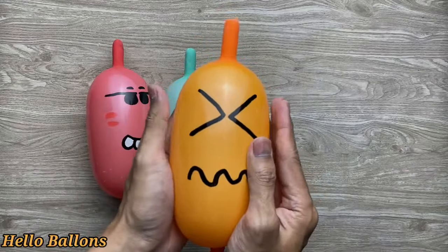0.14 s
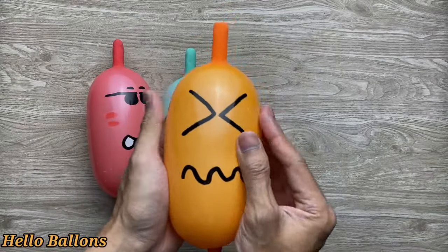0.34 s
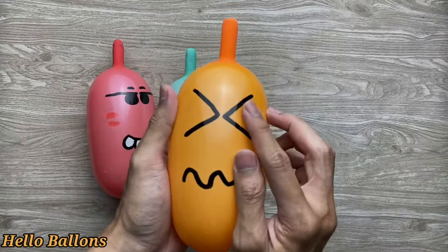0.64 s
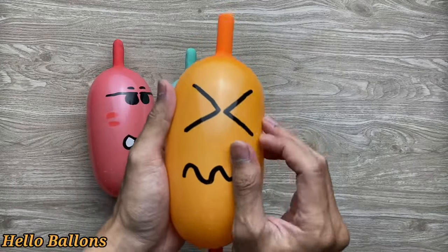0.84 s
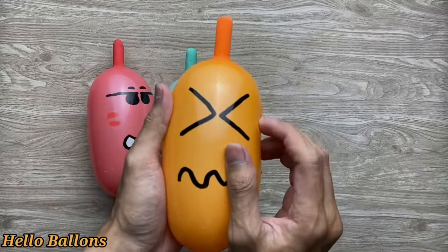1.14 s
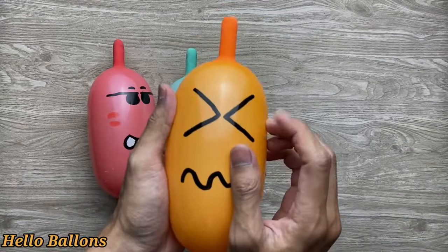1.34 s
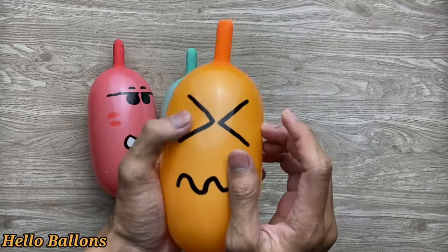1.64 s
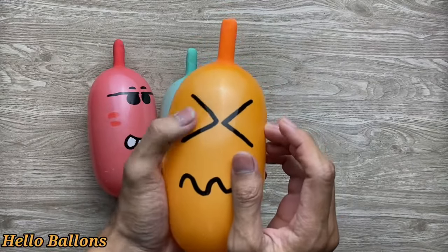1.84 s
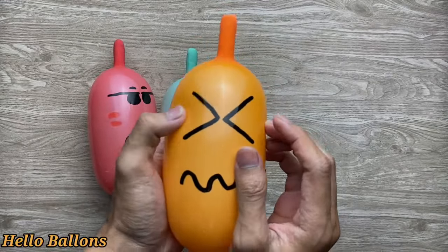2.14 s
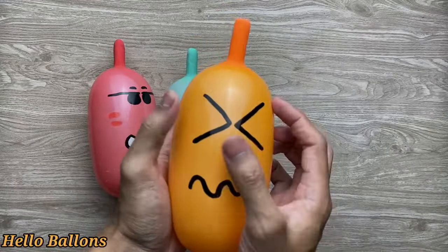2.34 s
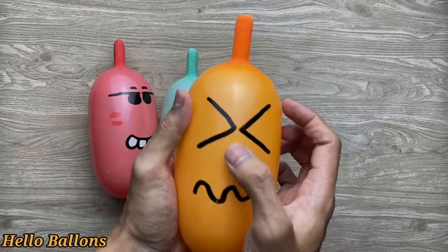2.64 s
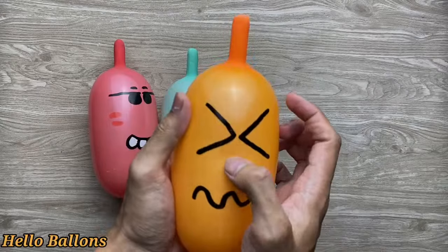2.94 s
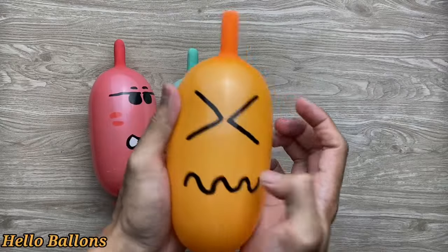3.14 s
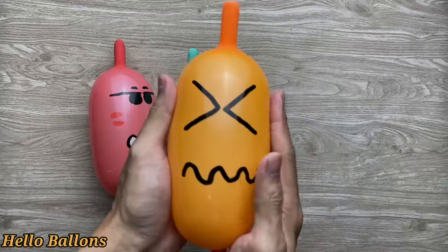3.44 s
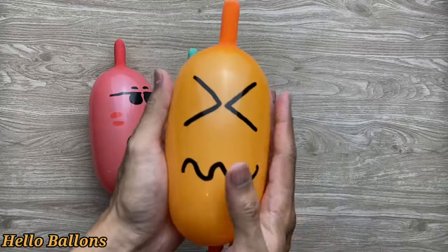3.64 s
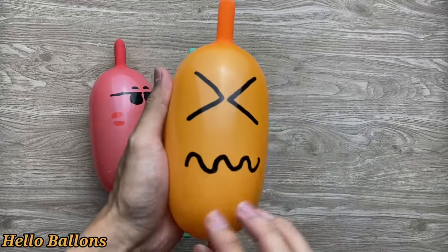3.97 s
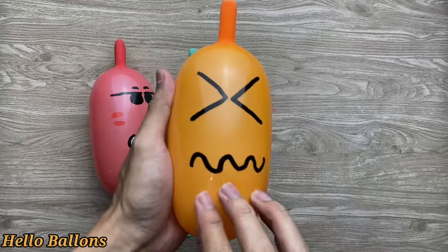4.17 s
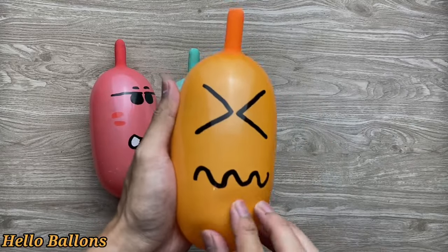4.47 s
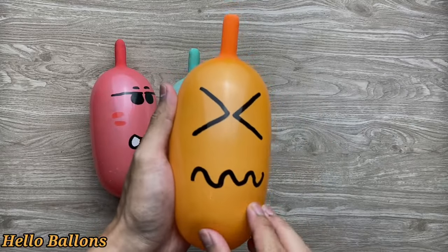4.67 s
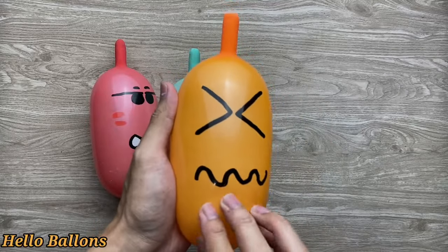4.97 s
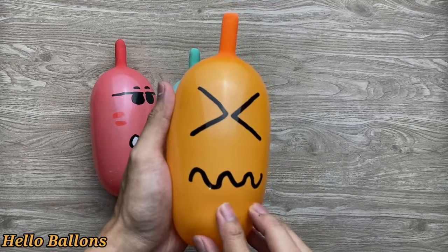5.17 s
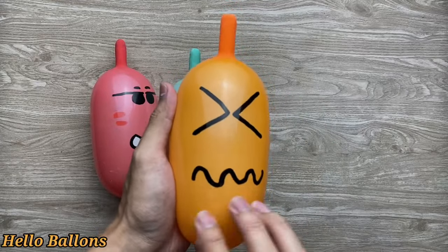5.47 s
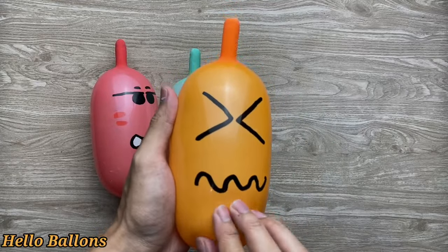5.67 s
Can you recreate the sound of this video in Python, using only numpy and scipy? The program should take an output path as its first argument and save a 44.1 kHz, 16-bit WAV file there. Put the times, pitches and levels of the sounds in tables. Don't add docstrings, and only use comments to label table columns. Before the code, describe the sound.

Close stereo microphone in a small quiet room: fingertips stick and slip on a filled latex balloon. Short hollow mid-pitched grunts and scrapes come in separate bursts, with small ticks and bright release pops. Around the middle it is sparser, then sharp pops cluster, one very brief squeak sounds, and several fingers scrape in dense fluttering bursts to the end. Low room rumble lies beneath.

```python
import sys
import numpy as np
from scipy import signal
from scipy.fft import rfft, irfft, next_fast_len
from scipy.io import wavfile
from scipy.ndimage import uniform_filter1d, map_coordinates

SR = 44100
rng = np.random.default_rng(int(sys.argv[2]) if len(sys.argv) > 2 else 0)


def boost_factor(decibels):
    exponent = np.asarray(decibels, float) / 20
    return 10 ** exponent


def pcm_store(signal):
    levels = np.round(np.clip(np.atleast_2d(signal), -1, 1) * 32767)
    wavfile.write(sys.argv[1], SR, levels.astype(np.int16).T)


N = 256220

# start t/s, rise t/s, fall t/s, ring level/dB, rasp level/dB re ring
DRAGS = [(1.016, 0.0662, 0.02, -19, -32), (1.258, 0.012, 0.085, -27.5, -26.5),
         (1.44, 0.03, 0.042, -23.5, -23.5), (1.6, 0.0734, 0.0166, -24, -10.5),
         (2.145, 0.073, 0.0025, -37, -18), (2.705, 0.053, 0.005, -30, -13.5),
         (2.772, 0.0014, 0.026, -18.5, -23.5), (2.912, 0.06, 0.022, -30, -15),
         (3.083, 0.038, 0.0035, -30, -10.5), (3.485, 0.0013, 0.033, -15.5, -26),
         (3.578, 0.0024, 0.022, -35.5, -8.5), (3.74, 0.021, 0.027, -21, -30.5),
         (4.877, 0.046, 0.02, -35, -13)]
SCRAPES = [(0.0, 0.037, 0.0014, -30, -20), (.24, 0.033, 0.036, -23.5, -29),
           (3.765, 0.042, 0.02, -29, -26.5), (.733, 0.045, 0.04, -27.5, -21),
           (4.174, 0.0091, 0.016, -26, -18.5), (1.033, 0.011, 0.017, -33.5, -23),
           (4.275, 0.016, 0.047, -25.5, -16.5), (4.376, 0.047, 0.042, -23.5, -16.5),
           (4.523, 0.025, 0.032, -20, -22), (4.6, 0.0031, 0.0061, -27, -40),
           (4.93, 0.022, 0.016, -32.5, -11), (4.985, 0.0083, 0.1, -25.5, -24.5),
           (5.162, 0.01, 0.034, -26, -25), (5.19, 0.037, 0.0054, -32, -15.5),
           (5.255, 0.035, 0.044, -24.5, -22.5), (5.605, 0.034, 0.03, -27, -23.5),
           (5.68, 0.05, 0.049, -24, -21.5)]
BRUSHES = [(.36, 0.062, 0.021, -45.5, -11.5), (.49, 0.018, 0.045, -46, -22.5),
           (1.84, 0.013, 0.11, -35.5, -18.5), (2.45, 0.02, 0.13, -37, -16),
           (3.41, 0.0061, 0.39, -45, -28.5), (3.598, 0.011, 0.16, -59.5, -4.5),
           (4.12, 0.052, 0.0094, -43, -14), (4.8, 0.047, 0.022, -58, -15.5),
           (.195, 0.013, 0.15, -42.5, -20), (3.14, 0.02, 0.033, -35.5, -25),
           (3.86, 0.0091, 0.037, -37.5, -24.5), (4.63, 0.011, 0.032, -35.5, -21),
           (4.69, 0.018, 0.079, -49.5, -7), (5.39, 0.017, 0.034, -64, 9)]
# landing level/dB, end of fall level/dB, wall push level/dB re ring
DRAG_SHAPE = (-19, -58.5, -20)
SCRAPE_SHAPE = (-7, -2.5, -26)
BRUSH_SHAPE = (-19, -20.5, -33)
# start t/s, end t/s
DRY_SKIN = [
    (1.84, 1.93),
    (2.45, 2.6),
    (2.7, 2.77),
    (3.08, 3.12),
    (1.4, 1.46),
    (1.59, 1.65),
    (2.92, 2.97),
    (4.27, 4.35),
]
# t/s, level/dB
SQUEEZE = [(0.0, 6), (.5, 4.5), (1.5, 5.5), (2.1, -10), (2.6, -18), (3.5, 1), (3.8, -9), (4.2, -25),
           (4.32, -30), (4.5, -17), (4.95, -26), (5.05, -10), (5.2, 11), (5.35, 4.5), (5.62, -22),
           (5.72, 3)]
# t/s, ring peak level/dB, f/Hz, wall boom level/dB re ring
JERKS = [(0.003, -20, 604, -17), (0.014, -18.5, 703, -14), (0.026, -23, 550, 3), (0.039, -17, 616, -7),
         (0.046, -23, 610, 4.5), (0.25, -22.5, 710, 2.5), (0.255, -44, 680, -25),
         (0.261, -16.5, 670, -18.5), (0.27, -17, 620, -32.5), (0.276, -25.5, 620, -19),
         (0.282, -15.5, 624, -14.5), (0.288, -25, 630, 6), (0.295, -18, 630, -18), (0.305, -30, 715, -21),
         (0.31, -25, 747, -18.5), (0.736, -20, 680, -10.5), (0.742, -20, 653, -31), (0.752, -18.5, 667, 1),
         (0.757, -18.5, 825, 4), (0.768, -18, 695, -12), (0.779, -15.5, 618, -7.5), (0.784, -23, 640, 6),
         (0.795, -11.5, 758, -15), (0.805, -17.5, 846, -28.5), (3.512, -12.5, 830, -4.5),
         (1.039, -19, 614, -5.5), (1.054, -24, 570, -4), (1.068, -14, 650, -26), (1.077, -21, 697, -18),
         (1.46, -18.5, 633, -39), (1.474, -17.5, 725, -10), (1.489, -39, 795, -22), (1.625, -22, 623, -16),
         (1.639, -23.5, 743, 0.5), (1.652, -15, 765, -18), (1.66, -19, 788, -4), (1.67, -31, 474, -27),
         (2.766, -18.5, 699, -15), (2.774, -17, 686, -24.5), (2.783, -21.5, 707, -28),
         (2.971, -18, 707, -12.5), (3.124, -16, 625, -4), (2.984, -24, 670, -13), (3.579, -15, 632, -20),
         (3.808, -11, 702, -21), (3.819, -22.5, 640, -18), (3.825, -22.5, 560, -11), (3.83, -29, 480, -11),
         (4.992, -23.5, 783, -20), (5.045, -16, 705, -26), (5.771, -16.5, 750, -11)]
# t/s, ring peak level/dB, f/Hz, swell t/s
CATCHES = [(4.176, -21, 724, 0.0046), (4.199, -34, 654.7, 0.0051), (4.2, -21, 701.3, 0.004),
           (4.279, -24.5, 620.2, 0.0051), (4.296, -18, 785.2, 0.0044), (4.304, -33.5, 765.3, 0.0035),
           (4.323, -22.5, 730, 0.0038), (4.348, -28, 713.4, 0.0042), (4.381, -19, 726.6, 0.0032),
           (4.398, -15.5, 672.6, 0.0051), (4.412, -11, 684, 0.0045), (4.428, -11.5, 705.8, 0.0036),
           (4.435, -27, 729.5, 0.0037), (4.453, -23, 679, 0.0075), (4.53, -20.5, 862.5, 0.0032),
           (4.541, -18.5, 600.5, 0.0083), (4.561, -18, 788.3, 0.0049), (4.567, -18, 685, 0.0059),
           (4.607, -25.5, 692.5, 0.0035), (4.906, -22.5, 663.8, 0.0044), (4.941, -30.5, 763.4, 0.0052),
           (4.983, -18, 756, 0.0054), (5.001, -18.5, 835.3, 0.0014), (5.008, -22, 722.7, 0.0034),
           (5.021, -18, 713.4, 0.0026), (5.026, -26, 633, 0.0018), (5.035, -16.5, 701.7, 0.003),
           (5.063, -22.5, 630.1, 0.0058), (5.095, -23.5, 728.6, 0.0026), (5.165, -23.5, 671.5, 0.0039),
           (5.198, -20, 699, 0.0035), (5.221, -17.5, 629, 0.0035), (5.231, -20.5, 763.7, 0.0035),
           (5.259, -23, 812.6, 0.0056), (5.268, -23.5, 751.7, 0.0062), (5.288, -19.5, 882, 0.0071),
           (5.317, -20.5, 754, 0.0045), (5.61, -23, 777, 0.0087), (5.621, -26, 711, 0.0064),
           (5.652, -18, 694.6, 0.0066), (5.669, -21, 690, 0.0047), (5.685, -22, 628, 0.0063),
           (5.694, -18, 725, 0.0044), (5.711, -16, 598, 0.0038), (5.722, -18, 648, 0.0053),
           (5.74, -15.5, 758, 0.0049), (5.757, -17, 741, 0.0056), (5.766, -19, 726, 0.0043),
           (5.79, -20, 695, 0.0063)]
# t/s, ring peak level/dB, thud level/dB re ring, peel hiss level/dB re ring
POPS = [(0.069, -20.5, 5, -11), (0.078, -19.5, -29.5, 2.5), (0.25, -41.5, 8, -14.5), (0.32, -14, -3, -5),
        (1.268, -25.5, -7, -36), (1.421, -41, 14, -7.5), (1.942, -29, 13, -3.5), (2.016, -32, -18.5, -15),
        (2.043, -30, 23, -14), (2.048, -19, -17.5, -8.5), (2.214, -13.5, 5.5, -13.5),
        (2.765, -21, -10, -21), (2.971, -28.5, -15.5, -9), (3.122, -10, -1, -24.5), (3.216, -14, -8, -27),
        (3.235, -15, -2.5, -4.5), (3.319, -21.5, -0.5, -23), (3.445, -35.5, 2, -10), (3.483, -25.5, -9, -6),
        (3.512, -13.5, 5, -4), (3.579, -29, -9, -9.5), (4.296, -14.5, -30, -22.5),
        (4.992, -32.5, -18, -0.5)]
# t/s, ring peak level/dB, peel hiss level/dB re ring
TICKS = [(0.198, -35, -22), (.44, -38, -13.5), (2.528, -32, -16), (4.725, -48, -4), (4.838, -40, -30),
         (0.209, -31, -43), (0.713, -31.5, -32), (0.723, -27, -29), (4.881, -33, -18), (3.241, -32.5, 6),
         (0.963, -41, -20.5), (1.209, -31.5, -24.5), (1.406, -34.5, -18), (1.451, -39, -24),
         (1.853, -37, -34), (1.886, -33, -15), (2.391, -43, -25), (2.507, -33.5, -7.5), (2.585, -32.5, -20),
         (2.871, -47, -18.5), (3.197, -30.5, -15), (3.333, -25, -41), (3.667, -39, -19), (3.697, -46, -8.5),
         (4.904, -52, -34)]
# t/s, level/dB, f/Hz
SQUEAK = [
    (3.757, -34, 640),
    (3.766, -19, 680),
    (3.771, -24, 630),
    (3.775, -11.5, 600),
    (3.788, -9.6, 598),
    (3.797, -9.8, 596),
    (3.803, -17, 590),
    (3.808, -34, 585),
]
# start t/s, length t/s, peak level/dB, first f/Hz, last
# f/Hz
CHIRPS = [(.402, .016, -48, 3050, 3200), (3.234, 0.013, -18.5, 1050, 996), (3.234, 0.013, -29, 1350, 1160),
          (4.9, .07, -38, 1000, 1340), (4.988, .06, -31, 960, 800), (4.95, .085, -42, 1610, 1580),
          (5.68, .125, -27, 370, 450), (1.07, .014, -30, 1280, 1270), (4.195, .02, -36, 1560, 1620),
          (5.318, 0.04, -30.5, 410, 430), (3.806, 0.035, -27, 680, 530), (3.748, .022, -33, 230, 420),
          (3.802, .055, -28, 400, 160), (3.818, .024, -29, 450, 370), (5.52, .035, -50, 725, 680),
          (5.2, 0.049, -30, 450, 190), (4.39, 0.06, -27, 430, 340), (5.715, .07, -27, 800, 950),
          (5.04, .07, -32, 430, 330), (4.535, .05, -28, 420, 380)]
# t/s, level/dB
CREAK = [(0.0, -53), (0.14, -70.5), (0.47, -74), (3.68, -66), (3.91, -76), (4.2, -65), (4.55, -41),
         (4.68, -64.5), (4.95, -77), (5.3, -51), (5.6, -81)]
# f/Hz, width f/Hz, level/dB
AIR_MODES = [(411, 24, 8), (606.4, 15, 8), (686.6, 78, 15.5), (814, 38, -3), (899, 80, 7.5), (1065, 200, 1),
             (1255, 29, -7), (1694, 130, -15), (1576, 26, -4), (2853, 24, -11.5), (3150, 43, -20)]
# t/s, f/Hz
AIR_PITCH = [(0.0, 667), (0.44, 709), (0.53, 670), (0.89, 780), (0.97, 602), (1.73, 793), (2.02, 682),
             (2.56, 724), (3.12, 693), (3.23, 775), (3.37, 588), (3.5, 800), (3.67, 658), (4.0, 636),
             (4.2, 803), (4.98, 766), (5.18, 662), (5.34, 834)]
# f/Hz, width f/Hz, level/dB
WALL_MODES = [(128, 25, 7.5), (191, 11, -8.5), (270, 48, -5.5), (354, 78, 18.5)]
# f/Hz, width f/Hz, level/dB
SKIN_MODES = [(1020, 200, 17), (1266, 29, 6), (1611, 45, 12), (2021, 32, 9.5), (2194, 50, -4),
              (2810, 38, 10.5), (3150, 34, 10.5), (3380, 990, 16), (3643, 19, 1), (4430, 40, 0.5),
              (4940, 24, -13), (5320, 22, -6), (5670, 22, -9), (6140, 980, 2)]
# f/Hz, level/dB
RASP = [(700, -68), (1300, 5.5), (2500, 3.5), (4500, -4.5), (7000, -8), (10000, -13), (15000, -20)]
# f/Hz, level/dB per Hz
RUMBLE = [(15, -41), (25, -3), (74, 7.5), (96, -15), (124, -1.5), (145, -24.5), (161, -11.5), (183, -8.5),
          (291, -13), (500, -33.5), (665, -52), (1200, -41), (12000, -62), (15600, -106), (22000, -120)]
# t/s, level/dB
RUMBLE_SWELL = [
    (0.0, -53),
    (0.69, -55),
    (1.07, -53.5),
    (1.25, -58),
    (1.67, -50.5),
    (2.72, -55.5),
    (3.749, -50.5),
    (5.149, -50.5),
    (5.52, -52),
    (5.81, -62),
]
# start t/s, end t/s, f/Hz, width f/Hz, level/dB
HUMS = [
    (1.45, 2.145, 65.2, 5.8, -46),
    (4.498, 5.753, 181.6, 11.6, -55),
]
# f/Hz, t60 t/s
ROOM = [(150, 0.12), (700, 0.18), (3000, 0.12), (10000, 0.18)]
# f/Hz, level/dB re direct
ROOM_COLOUR = [(100, -10), (700, -12), (2500, -4.5), (8000, -6.5), (15000, -10.5)]
# f/Hz, phase/rad
PORT_LEAD = [(0, 0), (1380, 1.1), (1640, -0.5), (1890, 1.5), (2500, 1.4), (5000, 5.9), (7580, 4.6),
             (10500, -0.6), (11300, -3.0), (12700, -3.2), (13300, -6.3), (14500, -6.4), (15500, -9.9),
             (16000, -7.7)]
# f/Hz, left minus right level/dB
PORT_BALANCE = [(60, -4), (150, 2), (380, 1), (650, 0), (1100, 5), (2380, 5.5), (4200, 8), (7000, -3.5),
                (15000, 1.5)]
# t/s, extra path to the right port/samples
HAND_SIDE = [(0, 2.0), (.5, 1.5), (.7, -1.8), (1.3, -1.0), (1.6, 1.0), (2.3, 2.0), (2.7, .2), (3.1, 2.0),
             (3.9, 2.0), (4.1, -1.0), (5.81, -1.0)]
# f/Hz, level/dB
MICROPHONE = [(6500, -2), (7800, 0), (8600, -1.5), (9300, 4), (10500, -2), (11500, 0.5), (12200, -9),
              (13000, 1), (14500, 2.5), (15400, -6.5), (15900, -20.5), (17000, -46.5)]

PATCH_DB = 2.5
AIR_WIDTH_HZ = 75.0
LEAD_S = 0.001


def strokes():
    t = np.arange(N) / SR
    ring_gain, wall_gain, rasp_gain = pressure()
    several = t > 4.1
    dry = sum((t > start) & (t < end) for start, end in DRY_SKIN) > 0
    slips_per_s = np.where(several, 215., np.where(dry, 155., 130.))
    knocks = slips(slips_per_s, uneven=np.where(dry, .1, .3), spread_db=2.5)

    flare = through(knocks, np.exp(-np.arange(600) / SR / 0.0017))
    hiss = rng.standard_normal(N) * (1.38 + flare / flare.mean())
    ticks = np.where(dry, .5, .08) * knocks
    rasp = rasp_gain * (ticks + np.where(dry, .3, .55) * hiss)

    rub = 0.22 * soften(knocks, .0009) + np.where(several, .22, .2) * hiss
    drag = soften(ring_gain * rub, 0.00046)
    air = 0.69 * wandering(drag, AIR_MODES, wander_db=PATCH_DB)
    air += 10.2 * resonate(drag, curve(AIR_PITCH), AIR_WIDTH_HZ)
    skin = patchy(through(rasp, tick(RASP)), patch_db=PATCH_DB)
    skin += 0.12 * wandering(rasp, SKIN_MODES, wander_db=PATCH_DB)
    wall = wandering(soften(wall_gain * knocks, 0.0018), WALL_MODES, wander_db=-1.5)
    return air + skin + wall


def pressure():
    touch_s, touch_db = 0.0064, -24.5
    lift_s, lift_db = 0.024, -19
    rise_bend = 0.93
    push_grows = 0.61
    follows = [1, 1, 1]
    gains = np.zeros((3, N))
    kinds = ((DRAGS, DRAG_SHAPE), (SCRAPES, SCRAPE_SHAPE), (BRUSHES, BRUSH_SHAPE))
    for rows, (land_db, end_db, push_db) in kinds:
        for start, rise, fall, db, rasp_db in rows:
            t = np.arange(-min(start, touch_s), rise + fall + lift_s, 1 / SR)
            swing_db = land_db * np.clip(1 - t / rise, 0, 1) ** rise_bend
            swing_db += end_db * np.clip((t - rise) / fall, 0, 1)
            edge_db = lift_db * np.clip((t - rise - fall) / lift_s, 0, 1)
            edge_db += touch_db * np.sqrt(np.clip(-t / touch_s, 0, 1))
            top_db = [[db], [push_db + push_grows * db], [db + rasp_db]]
            layers = boost_factor(edge_db + np.outer(follows, swing_db) + top_db)
            part = gains[:, round((start + t[0]) * SR):][:, :len(t)]
            part[:] = np.maximum(part, layers[:, :part.shape[1]])
    return gains * [np.ones(N), boost_factor(curve(SQUEEZE)), np.ones(N)]


def slips(per_s, uneven, spread_db):
    drift = evened(uniform_filter1d(rng.standard_normal(N), size=200))
    pace = per_s * np.exp(uneven * drift)
    at = np.diff(np.floor(np.cumsum(pace) / SR), prepend=0) > 0
    return at * boost_factor(spread_db * rng.standard_normal(N)) * np.sqrt(SR / per_s)


def jerks():
    swell_s, sag = 0.0024, 0.06
    out, t = np.zeros(N + 3000), np.arange(2600) / SR
    boom_hz = 110. + 336.0 * np.exp(-t / .007)
    boom = sweep(boom_hz) * np.exp(-t / 0.013) * np.minimum(t / 0.0022, 1)
    u = t / swell_s
    for s, db, hz, boom_db in JERKS:
        tone = u * np.exp(1 - u) * sweep(hz * (1 + sag * np.exp(-u / 2)))
        start = round(max(s - LEAD_S, 0) * SR)
        out[start:][:len(t)] += boost_factor(db - 3.5) * (tone + boost_factor(boom_db) * boom)
    out = out[:N]
    rattle = wandering(abs(out) * rng.standard_normal(N), AIR_MODES[5:], wander_db=PATCH_DB)
    return out + boost_factor(-16.0) * rattle


def catches():
    power, t = np.zeros(N + 3000), np.arange(2600) / SR
    for s, db, _, swell in CATCHES:
        u = t / max(swell, 1e-3)
        power[round((s - LEAD_S) * SR):][:len(t)] += boost_factor(2 * db) * (u * np.exp(1 - u)) ** 2
    level = boost_factor(-1.5) * np.sqrt(power[:N])

    s, _, hz, swell = np.transpose(CATCHES)
    waver = 1 + .02 * evened(uniform_filter1d(rng.standard_normal(N), size=120))
    tone = sweep(np.interp(np.arange(N) / SR, s + swell, hz) * waver)
    rough = soften(level * rng.standard_normal(N), 0.00032)
    halo = wandering(rough, AIR_MODES[4:], wander_db=PATCH_DB)
    return level * tone + boost_factor(-9.5) * halo


def pops():
    tick_thud_db, rebound_s, rebound_db = -14, .0068, -13.5
    knock, thud, peel = np.zeros((3, N))
    small = [(s, db, tick_thud_db, peel_db) for s, db, peel_db in TICKS]
    for s, db, thud_db, peel_db in POPS + small:
        at = round(s * SR)
        knock[at] += boost_factor(db)
        knock[at + round(rebound_s * SR)] += boost_factor(db + rebound_db)
        thud[at] += boost_factor(db + thud_db)
        peel[at] += boost_factor(db + peel_db)

    knock = soften(knock, 0.00051)
    air = boost_factor(11.0) * wandering(knock, AIR_MODES, wander_db=8.5)
    air += boost_factor(36.0) * resonate(knock, curve(AIR_PITCH), AIR_WIDTH_HZ)

    t = np.arange(3000) / SR
    rise = 1 - np.exp(-t / .004)
    burst = rise * (np.exp(-(t / 0.0057) ** 2) + 0.65 * np.exp(-t / 0.0017))
    grain = rng.standard_normal(N) * boost_factor(5.5 * rng.standard_normal(N))
    snap = boost_factor(5) * peel
    bright = snap + boost_factor(-1.0) * through(through(peel, burst) * grain, [.6, .4])
    skin = patchy(through(bright, tick(RASP)), patch_db=PATCH_DB)
    skin += 1.145 * wandering(bright, SKIN_MODES, wander_db=PATCH_DB)

    boing = sweep(95. + 406.0 * np.exp(-t / .007)) * np.exp(-t / 0.018)
    wall = boost_factor(9.5) * through(soften(thud, 0.0025), ring(WALL_MODES))
    wall += boost_factor(-15.0) * through(thud, boing)
    return air + wall + skin


def squeak():
    s, db, hz = np.transpose(SQUEAK)
    t = np.arange(N) / SR
    turn = 2 * np.pi * np.cumsum(np.interp(t, s, hz)) / SR
    level = np.interp(t, s, boost_factor(db), left=0, right=0) * np.sqrt(2)
    return level * (np.sin(turn) + boost_factor(-41.5) * np.sin(2 * turn) + boost_factor(-38.0) * np.sin(3 * turn))


def squeak_rasp():
    s, db, _ = np.transpose(SQUEAK)
    level = np.interp(np.arange(N) / SR, s, boost_factor(.5 * db - 42.5), left=0, right=0)
    return patchy(through(level * rng.standard_normal(N), tick(RASP)), patch_db=PATCH_DB)


def chirps():
    overtone_db = -22.5
    out = np.zeros(N)
    for start, length, db, first_hz, last_hz in CHIRPS:
        u = np.arange(0, 1, 1 / (length * SR))
        noise = rng.standard_normal(8000)[:len(u)]
        hz = first_hz + (last_hz - first_hz) * u
        tone = evened(resonate(resonate(noise, hz, 115.), hz, 115.))
        tone += boost_factor(overtone_db) * evened(resonate(noise, 2 * hz, 80.))
        shape_db = np.interp(u, [0, .4, 1], [-6, 0, -10])
        out[round(start * SR):][:len(u)] += tone * boost_factor(db + shape_db)
    return out


def creaks():
    at = rng.random(N) < 260. / SR
    size_db = 0.43 * np.minimum(rng.exponential(1, N), 4)
    knocks = at * boost_factor(size_db) * rng.choice([-1, 1], N)
    level = boost_factor(np.minimum(curve(CREAK), -54))
    return level * through(evened(soften(knocks, .001)), ring(AIR_MODES[:5]))


def rumble():
    frames, hz = N // 512 + 5, np.fft.rfftfreq(2048, 1 / SR)
    a, b, c, d, patches = rng.standard_normal((frames, 1025, 5)).T
    patches = uniform_filter1d(uniform_filter1d(patches, size=6, axis=0), size=12, axis=1)
    common, apart = a + 1j * b, .22 * (c + 1j * d)
    z = np.array([common + apart, common - apart])
    swell_db = np.interp((np.arange(frames) - 2) * 512 / SR, *np.transpose(RUMBLE_SWELL))
    deep = 1 / (1 + (hz / 140.) ** 2)
    swing_db = np.outer(deep, swell_db - swell_db.mean())
    z *= boost_factor(read(RUMBLE, hz)[:, None] + 1.0 * evened(patches) + swing_db)
    return boost_factor(-45.5) * evened(signal.istft(z, nperseg=2048, noverlap=1536)[1][:, :N])


def hums():
    t, out = np.arange(N) / SR, np.zeros(N)
    for start, end, hz, width, db in HUMS:
        pitch = np.full(N, hz)
        drone = evened(resonate(resonate(rng.standard_normal(N), pitch, width), pitch, width))
        fade = np.clip(np.minimum(t - start, end - t) / 0.14, 0, 1)
        out += boost_factor(db) * fade * drone
    return out


def ports(x):
    s, extra = np.transpose(HAND_SIDE)
    late = map_coordinates(x, [np.arange(N) - np.interp(np.arange(N) / SR, s, extra)], order=5)
    size = next_fast_len(N + 2048)
    hz = np.fft.rfftfreq(size, 1 / SR)
    lead_hz, lead = np.transpose(PORT_LEAD)
    half = boost_factor(read(PORT_BALANCE, hz) / 2) * np.exp(.5j * np.interp(hz, lead_hz, lead))
    near, far = rfft([x, late], size)
    shaded = 1 / (1 + (hz / 5500) ** 6)
    return irfft([near * half, (shaded * far + (1 - shaded) * near) / half], size)[:, :N]


def room(x):
    taps = np.zeros((2, SR // 2))
    slots = np.arange(120, SR // 2 - 40, 20)
    at = slots + rng.integers(0, 20, (2, len(slots)))
    np.put_along_axis(taps, at, rng.choice([-1., 1.], at.shape), 1)
    hz, t, z = signal.stft(taps, SR, nperseg=256)
    z = z * boost_factor(-60 * t / read(ROOM, hz)[:, None])
    colour = boost_factor(read(ROOM_COLOUR, hz))[:, None]
    z = z * colour / np.linalg.norm(z[0], axis=1)[:, None]
    tail = signal.istft(z, SR, nperseg=256)[1]
    flat = signal.istft(z / colour, SR, nperseg=256)[1]
    return signal.fftconvolve(x[None], tail / np.linalg.norm(flat[0]), axes=1)[:, :N]


def evened(x):
    return x / np.sqrt(np.mean(x ** 2) + 1e-20)


def curve(rows):
    return np.interp(np.arange(N) / SR, *np.transpose(rows))


def read(points, hz):
    f, value = np.transpose(points)
    return np.interp(np.log(hz + 1), np.log(f + 1), value)


def through(x, h):
    return signal.oaconvolve(x, h)[:N]


def sweep(hz):
    return np.sin(2 * np.pi * np.cumsum(hz) / SR)


def soften(x, seconds):
    push = np.hanning(max(round(seconds * SR), 3) + 2)
    return through(x, push / push.sum())


def tick(colour):
    hz = abs(np.fft.fftfreq(2048, 1 / SR))
    log_gain = np.log(boost_factor(np.maximum(read(colour, hz), -100)))
    h = np.fft.ifft(np.exp(np.conj(signal.hilbert(log_gain)))).real[:1024]
    return h / np.linalg.norm(h)


def ring(modes):
    t, h = np.arange(4096) / SR, np.zeros(4096)
    for hz, width, db in modes:
        decay = np.exp(-np.pi * width * t)
        h += boost_factor(db) * np.sqrt(width) * decay * np.sin(2 * np.pi * hz * t)
    return h / np.linalg.norm(h)


def resonate(x, hz, width):
    turn = np.exp(2j * np.pi * np.cumsum(hz) / SR)
    r = np.exp(-np.pi * width / SR)
    return 2 * (turn * signal.lfilter([1 - r], [1, -r], x / turn)).imag


def wandering(x, modes, wander_db):
    drift = uniform_filter1d(rng.standard_normal((N // 256 + 2, len(modes))), size=9, axis=0)
    share = boost_factor(wander_db * evened(drift))
    energy = sum(boost_factor(2 * db) for _, _, db in modes)
    at, out = np.arange(N) / 256, np.zeros(N)
    for k, mode in enumerate(modes):
        drive = x * np.interp(at, np.arange(len(share)), share[:, k])
        out += through(drive, ring([mode])) * boost_factor(mode[2])
    return out / np.sqrt(energy)


def patchy(x, patch_db):
    z = signal.stft(x, nperseg=256, noverlap=192)[2]
    field = uniform_filter1d(rng.standard_normal(z.T.shape), size=22, axis=0)
    field = evened(uniform_filter1d(field, size=5, axis=1))
    return signal.istft(z * boost_factor(patch_db * field.T), nperseg=256, noverlap=192)[1][:N]


def scene():
    balloon = strokes() + jerks() + catches() + pops()
    balloon += squeak() + squeak_rasp() + chirps() + creaks()
    return ports(balloon) + room(balloon) + rumble() + hums()


def roll_off(x):
    return signal.sosfilt(signal.butter(12, 16460, fs=SR, output="sos"), x)


def record(dry):
    low_cut = signal.butter(4, 58, "high", fs=SR, output="sos")
    cut = signal.sosfilt(low_cut, dry)
    hz = np.linspace(0, SR / 2, 513)
    colour = signal.firwin2(257, hz, boost_factor(read(MICROPHONE, hz)), fs=SR)
    mix = signal.oaconvolve(cut, colour[None], "same", axes=1)
    return roll_off(mix)


dry = scene()
out = record(dry)
pcm_store(out)
```